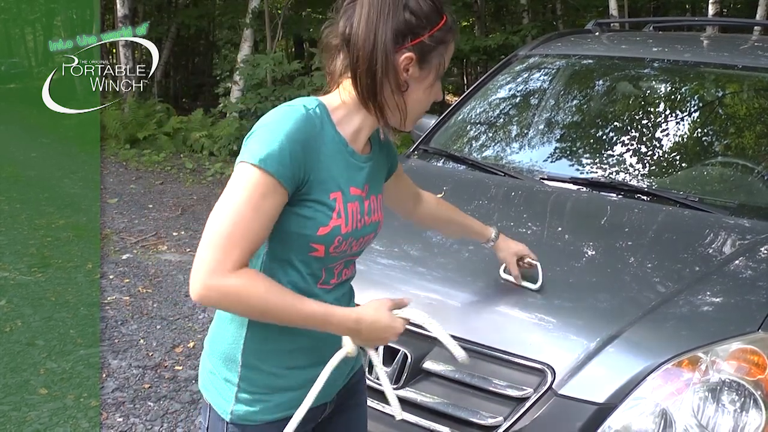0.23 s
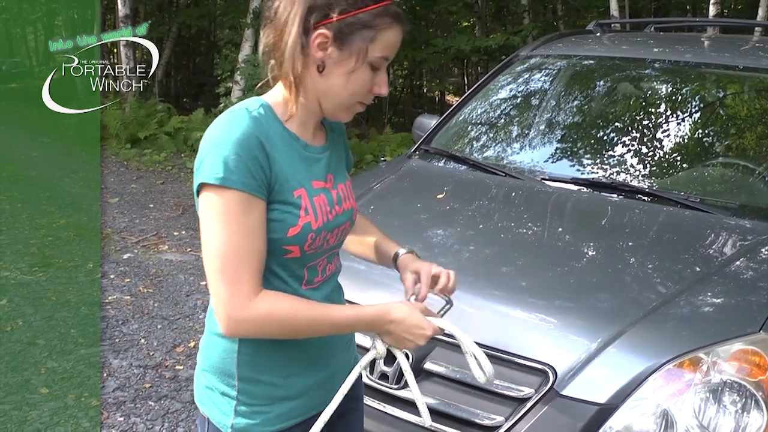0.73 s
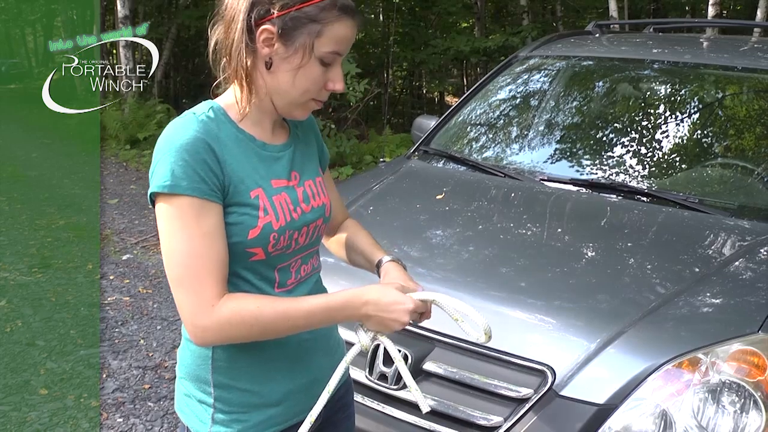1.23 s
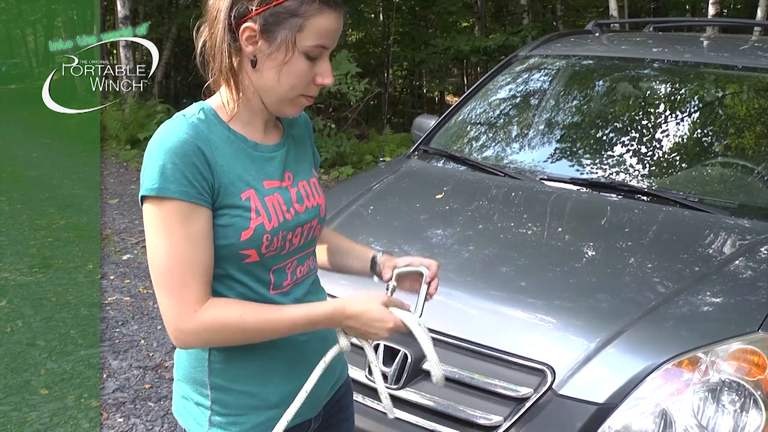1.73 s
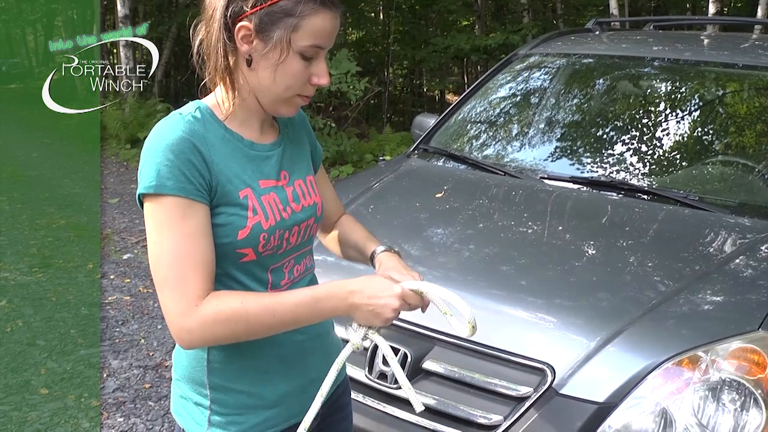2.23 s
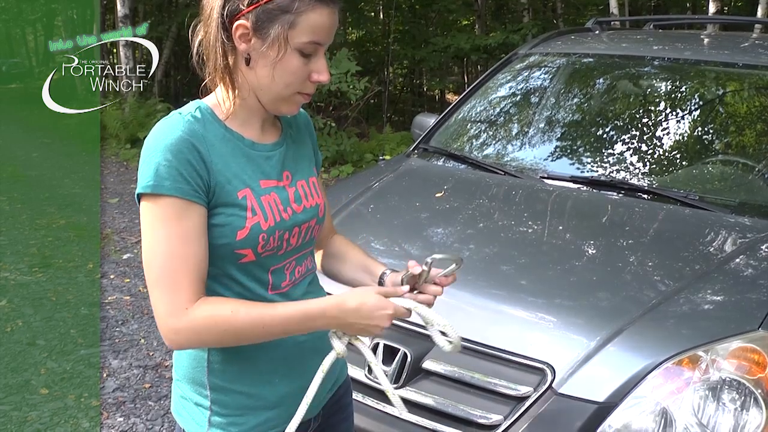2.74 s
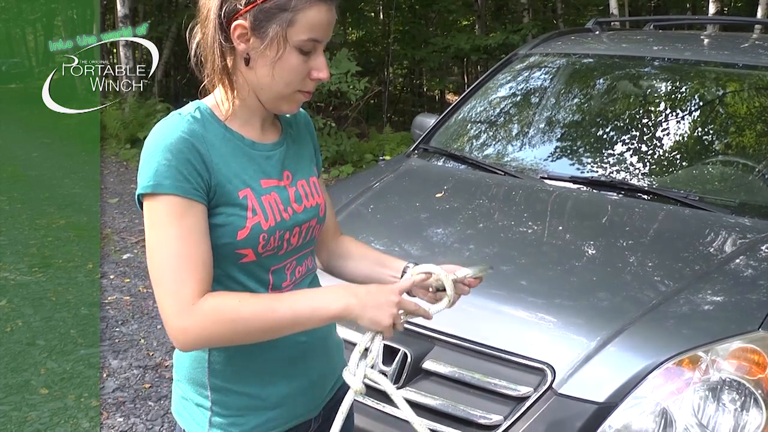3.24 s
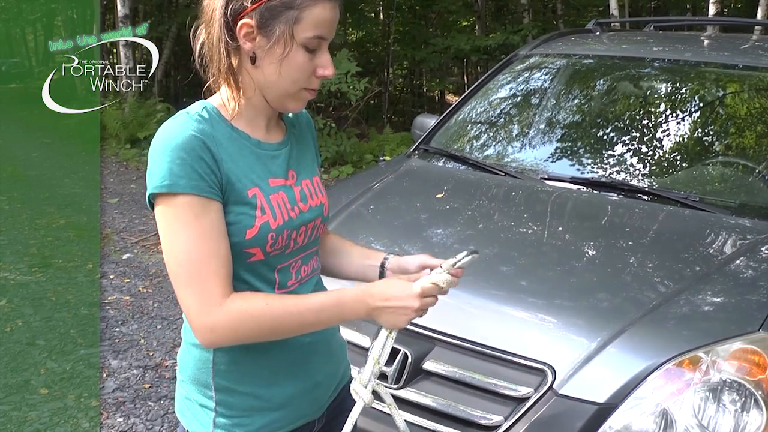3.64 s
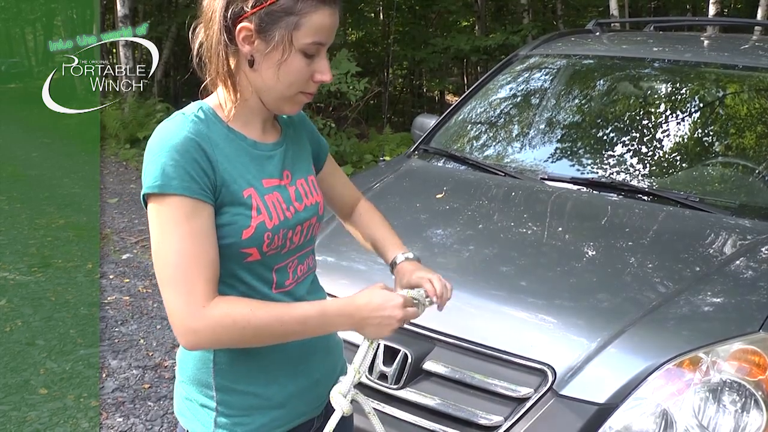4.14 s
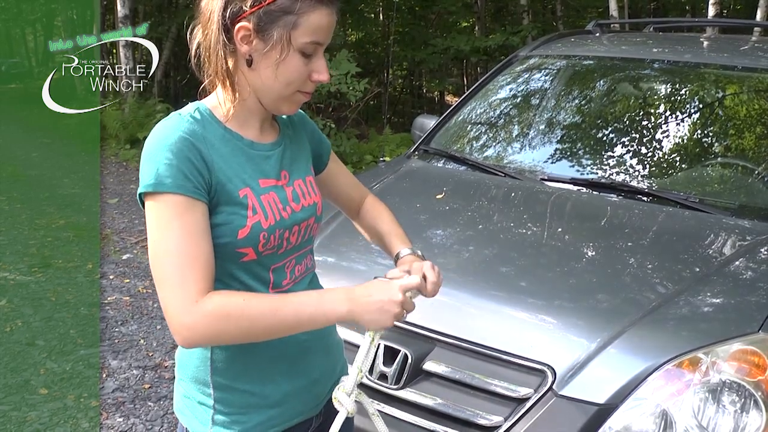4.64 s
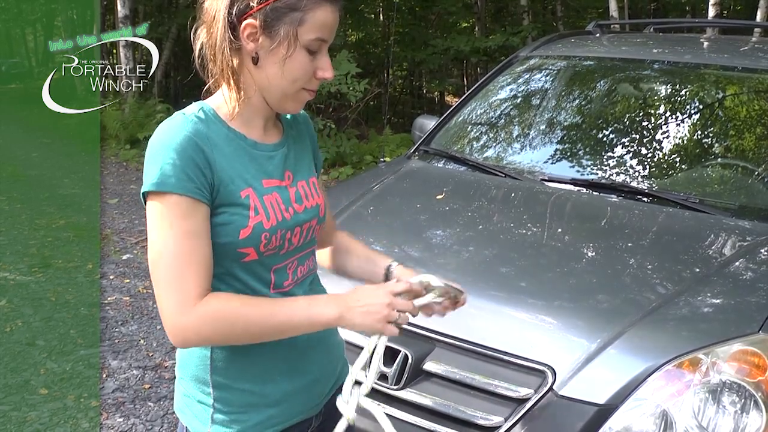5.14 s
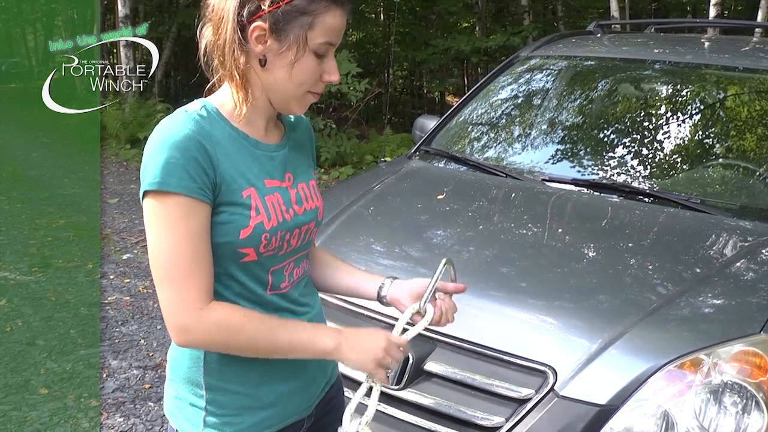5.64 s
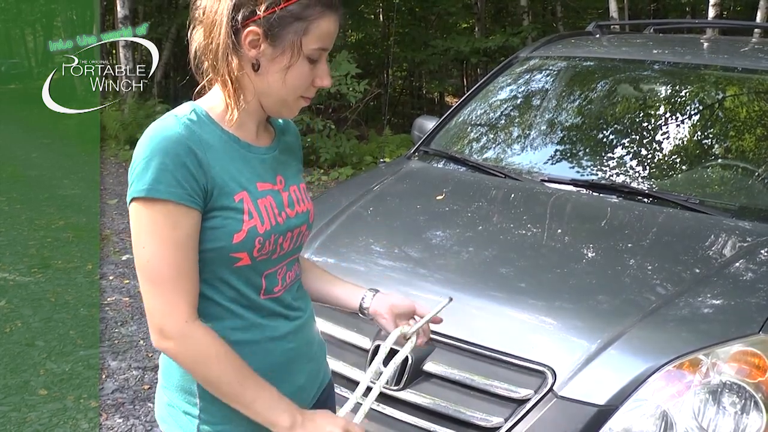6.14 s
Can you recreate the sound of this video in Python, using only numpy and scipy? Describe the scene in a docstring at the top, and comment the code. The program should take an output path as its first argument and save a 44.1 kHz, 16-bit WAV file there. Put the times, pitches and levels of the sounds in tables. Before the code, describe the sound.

A quiet scrape and light thumps on thin sheet metal open the scene, followed by a dull handling bump and a tiny steel tick. A carabiner gate then snaps shut twice, about two seconds apart: first open and bright, then tighter and damped in the hand. Gravel and trees give a short open-air echo. Rope fibres brush softly; a faint beating hum and low wind rumble continue throughout, picked up close.

```python
"""Knocks and a soft scrape come first: a steel carabiner is slid off a car's bonnet and clipped to a rope.
Its gate ticks once and snaps shut twice: each contact is a blow, a crack of noise and damped steel modes.
Gravel returns one echo and a wood a diffuse tail; thuds are decaying low modes, the rope is shaped noise.
Beneath lie a machine hum of beating tones and resonant noise, a low rumble of air and a little hiss."""
import sys
import numpy as np
from scipy import signal
from scipy.fft import rfft, irfft
from scipy.io import wavfile

SR = 44100
rng = np.random.default_rng(int(sys.argv[2]) if len(sys.argv) > 2 else 0)


def dump(signal):
    """Clip the signal to [-1, 1] and save it as 16-bit WAV at the path in sys.argv[1]."""
    limited = np.clip(np.atleast_2d(signal).T, -1, 1)
    pcm = np.round(limited * 32767).astype(np.int16)
    wavfile.write(sys.argv[1], SR, pcm)


N = 281269
T = np.arange(N) / SR

# Modes of the carabiner. Each row: frequency in Hz, t60 in seconds,
# relative level in dB in the open hand, relative level in dB in the closed grip.
STEEL_MODES = [(748, 0.018, -27.5, -34), (1186, .02, -36.5, -30.5), (1599, .03, -29, -21.5),
               (1855, 0.024, -25, -19.5), (2030, 0.03, -20.5, -26), (2450, 0.012, -26.5, -11.5),
               (2820, 0.015, -22, -17), (3007, 0.024, -4, -27.5), (3340, 0.02, -8.5, -24),
               (3690, .024, -6.5, -16), (3938, 0.036, -7, -11.5), (4175, 0.027, 0.5, -21),
               (4384, 0.021, 0, -24), (4780, 0.017, -16.5, -12.5), (4980, 0.03, -17, -15),
               (5350, 0.026, -8, -22), (5863, .02, -6, -27.5), (6270, 0.024, -15, -20.5),
               (6590, .02, -15, -21), (7780, 0.029, -14.5, -21.5), (7770, 0.024, -8.5, -20),
               (8760, .02, -18, -21.5), (9180, .024, -19.5, -14.5), (9406, 0.0234, -13.5, -17),
               (10350, 0.041, -19.5, -16), (11056, .016, -12.5, -27), (12250, 0.012, -20, -25.5),
               (13460, 0.02, -19.5, -29.5), (13380, .02, -25.5, -22.5), (15140, 0.014, -30, -15)]
# Bending modes that ring on long in the open hand; a closed grip quiets them. Each row: frequency in Hz,
# relative level in dB, t60 in seconds.
SINGING_MODES = [(3940, -48, 0.6), (4170, -41, 0.55), (4280, -40, 0.52), (4365, -43, .5)]
# Gate contacts. Each row: start in seconds, strength in relative dB,
# grip from 0 (open) to 1 (closed), contact softness as a low-pass cutoff in Hz.
GATE_CONTACTS = [(1.6996, -23.5, 0.65, 4900), (3.3087, -25, 0, 10100), (3.3135, 2.8, 0.16, 20000),
                 (5.1277, -0.5, 0.98, 20000), (5.1331, -17, 1, 20000)]
# Light touches of rope and fingers on the metal. Each row: start in seconds, strength in relative dB,
# contact softness as a low-pass cutoff in Hz.
LIGHT_TOUCHES = [(.447, -48, 3500), (1.203, -42, 5000), (1.838, -46, 3000), (2.614, -46, 4000),
                 (2.96, -44.5, 3000), (3.572, -44.5, 4000), (4.932, -43, 2200), (5.227, -45, 4000),
                 (5.452, -43, 2200), (5.816, -39, 2400), (6.338, -26.5, 2600)]

# Modes of the bonnet sheet. Each row: frequency in Hz, relative level in dB, t60 in seconds.
BONNET_MODES = [(63.6, -2, .25), (94, 1, 0.345), (120.7, 6.5, 0.33), (141, -11, 0.54), (200, -2.5, 0.23),
                (260.7, -6, 0.22), (363, -7, 0.063), (537, -7, 0.045), (804, -29, 0.098),
                (1100, -19, 0.019)]
# Knocks on the bonnet. Each row: start in seconds, relative level in dB.
BONNET_KNOCKS = [(0.097, -39), (.108, -29.5), (.142, -35), (0.249, -34), (.268, -30.5), (.306, -32)]
# Resonances of the scrape. Each row: frequency in Hz, bandwidth in Hz, relative level in dB.
SCRAPE_RESONANCES = [(141, 46, -3.5), (316, 110, -1), (530, 145, -5.5), (820, 86, -5), (1080, 120, -2.5),
                     (1430, 300, -7.5), (1840, 420, -8.5), (2870, 980, -12), (4490, 5600, -30)]
# Strokes of steel over paint: a skid, the drag and a short, lighter last push. # Each row: start in seconds,
# hold in seconds, level in dB.
SLIDE_STROKES = [(.096, 0.014, -42), (.168, .12, -41.5), (.25, 0.01, -44.5)]
SLIDE_ATTACK_S, SLIDE_RELEASE_S = 0.0074, 0.096
SHEET_DRONE_DB = -2.5  # the bonnet's modes under the scrape, relative to the scrape

# Modes of a dull handling bump. Each row: frequency in Hz, relative level in dB, t60 in seconds.
THUD_MODES = [(58.4, -2, .26), (69, 0.5, 0.19), (132, -7.5, .25), (230, -12.5, .12), (390, -8.5, 0.065)]
# Dull bumps. Each row: start in seconds, relative level in dB, softness as a low-pass cutoff in Hz.
DULL_BUMPS = [(1.48, -24, 900), (1.508, -19.5, 115), (1.579, -32, 65), (3.244, -28.5, 90)]

# Spectrum of the rope fibres. Each row: frequency in Hz, relative level in dB.
ROPE_SPECTRUM = [(600, -2), (1800, 3.5), (4000, -5), (9000, -18)]
# Pulls of rope through the hands. Each row: start in seconds, hold in seconds, level in dB.
ROPE_PULLS = [(4.89, 0.14, -64), (5.44, 0.018, -60), (5.63, 0.066, -62.5), (5.83, .06, -67)]
PULL_ATTACK_S, PULL_RELEASE_S = 0.044, 0.05
# Faint rustle of the fingers, present throughout.
FIDGET_DB, FIDGET_SWING_DB, FIDGETS_PER_S = -78, 4.5, 14

# Echo of the trees. Each row: frequency in Hz, relative level in dB, t60 in seconds.
WOOD_ECHO = [(302, -13, .4), (1502, -12, .45), (3160, -9, .48), (4300, 1, 0.59), (5972, -0.5, 0.42),
             (9200, 1.5, 0.34), (15000, -7, .31)]

# Resonances of the machine hum. Each row: frequency in Hz, half-width in Hz, level in dB outside the lulls.
HUM_RESONANCES = [(266.8, 2.2, -66.5), (311, 19, -63.5), (385.6, 3.5, -71), (453, 4.9, -71),
                  (804, 3, -70.5), (857, 62, -62.5), (944, 40, -66.5)]
# Lulls in the hum. Each row: start in seconds, hold in seconds,
# change of the main tone in dB, change of the weaker resonances in dB.
HUM_LULLS = [(3.17, 0.51, -19, -3), (3.43, 0.15, 1, -10.5), (5.132, 0.095, -22, -1), (6.32, .06, -8, 0)]
LULL_FALL_S, LULL_RETURN_S = 0.12, 0.099
BLIP_S, BLIP_HZ, BLIP_DB, BLIP_RAMP_S = 3.395, 900, -46, 0.015  # one faint blip in the hum

# Spectrum of the air rumble. Each row: frequency in Hz, relative level in dB.
RUMBLE_SPECTRUM = [(20, 3.5), (30, 1.5), (45, -7), (70, -8), (120, -18), (170, -27), (260, -33.5),
                   (420, -32.5), (700, -42), (1200, -78.5)]
# Gusts that lift the rumble. Each row: start in seconds, hold in seconds, rise in dB.
RUMBLE_GUSTS = [(1.58, .08, 6), (1.99, 0.11, 9), (2.73, .08, 7.5)]
GUST_RAMP_S, GUST_TOP_HZ = 0.047, 45
# Spectrum of the hiss. Each row: frequency in Hz, relative level in dB.
HISS_SPECTRUM = [(500, 3.5), (700, 10.5), (1200, 5), (1700, 1), (2600, -1), (4500, -2), (5350, 1.5),
                 (6300, -5), (10000, -5), (15500, -5.5)]
HISS_DB = -60.5  # rms
CUTOFF_HZ = 15700  # upper limit of the whole sound


def from_db(db):
    """Decibels as an amplitude ratio: 20 dB is a factor of ten."""
    return 10 ** (np.asarray(db) / 20)


def rms_one(x):
    """Normalization to unit root mean square."""
    return x / np.sqrt(np.mean(x ** 2) + 1e-20)


def at_hz(points, hz, axis=1):
    """Interpolation of a table column along logarithmic frequency."""
    points = np.array(points)
    return np.interp(np.log(np.maximum(hz, 1)), np.log(points[:, 0]), points[:, axis])


def cut(x, hz, kind, order=2):
    """Butterworth filtering, maximally flat in the pass band."""
    sections = signal.butter(order, np.clip(hz, 10, .47 * SR), kind, fs=SR, output="sos")
    return signal.sosfilt(sections, x + 1e-18)


def resonant(x, hz, width_hz):
    """Resonance as a pass band about its centre frequency; rms 1."""
    return rms_one(cut(x, [hz - width_hz / 2, hz + width_hz / 2], "band"))


def coloured(x, spectrum):
    """Spectral shaping: each frequency component is weighted by a level curve; rms 1."""
    gain = from_db(at_hz(spectrum, np.fft.rfftfreq(N, 1 / SR)))
    return rms_one(irfft(rfft(x) * gain, N))


def drift(rate):
    """Slow random variation: straight lines between normal values of unit spread, rate per second."""
    knots = rng.standard_normal(int(N / SR * rate) + 2)
    return np.interp(T * rate, np.arange(len(knots)), knots)


def ring(t, hz, t60):
    """Free decay of a struck mode: a sine that falls 60 dB in t60 seconds."""
    return np.sin(2 * np.pi * hz * t) * from_db(-60 * t / t60)


def swell(start, hold_s, attack_s, release_s):
    """Raised-sine envelope: it reaches 1 at the start, holds, then falls to 0."""
    ramp = np.minimum((T - start) / attack_s, (start + hold_s - T) / release_s)
    return np.sin(np.pi / 2 * np.clip(1 + ramp, 0, 1)) ** 2


def strokes(rows, attack_s, release_s):
    """Incoherent addition: where rubbing strokes overlap, their powers add."""
    power = sum((from_db(db) * swell(s, hold_s, attack_s, release_s)) ** 2 for s, hold_s, db in rows)
    return np.sqrt(power)


def add(out, s, sound):
    """Superposition of a sound that starts at s seconds."""
    start = max(round(s * SR), 0)
    out[start:start + len(sound)] += sound[:N - start]


def steel_modes(t, grip, scatter_db=2.0, twin_db=-4, twin_spread=0.026, paired_hz=4500):
    """Modal superposition: damped steel modes of alternating polarity, weighted in dB by the grip."""
    modes = 0
    for k, (hz, t60, open_db, closed_db) in enumerate(STEEL_MODES):
        level_db = open_db + grip * (closed_db - open_db) + scatter_db * rng.standard_normal()
        mode = ring(t, hz, t60)
        if hz > paired_hz:  # the loop also bends out of its plane, so high modes come in pairs that share the blow
            twin_hz = hz * (1 + twin_spread * rng.choice([-1, 1]) * rng.uniform(0.53, 1))
            pair = mode - from_db(twin_db) * ring(t, twin_hz, t60)
            mode = pair / np.hypot(1, from_db(twin_db))
        modes = modes + (-1) ** k * from_db(level_db) * mode
    return modes


def clink(grip, soft_hz, modes_db, crack_db=-6, crack_grip_db=-4.5, crack_t60=0.012, blow_db=-5):
    """Impact excitation: a blow, the gate's chatter and ringing modes; a softer contact passes less treble."""
    t = T[:SR // 8]
    modes = steel_modes(t, grip)
    blow = from_db(blow_db) * cut(ring(t, 2500, 0.00066), 890, "high")
    bright = cut(rng.standard_normal(len(t)), 1700, "high")
    chatter = rms_one(cut(bright, 7500, "low", order=1))
    crack = chatter * from_db(crack_db + grip * crack_grip_db - 60 * t / crack_t60)
    return cut(blow + crack + from_db(modes_db) * modes, soft_hz, "low")


def carabiner(modes_db, grip_damps_db=-30, waver_db=1.0, palm_hz=375, palm_db=-25, palm_t60=.012):
    """Contact damping: a closed grip quiets the singing modes of the gate snaps; soft touches are added."""
    out, t = np.zeros(N), T[:SR]
    for s, level_db, grip, soft_hz in GATE_CONTACTS:
        add(out, s, from_db(level_db) * clink(grip, soft_hz, modes_db))
        # in the open hand the loop sings on faintly, wavering as it turns
        sing = sum(from_db(db + waver_db * drift(90)[:SR]) * ring(t, hz, t60) for hz, db, t60 in SINGING_MODES)
        add(out, s, from_db(level_db + modes_db + grip * grip_damps_db) * sing)
        # and kicks against the palm
        add(out, s, from_db(level_db + palm_db) * (1 - grip) * ring(t, palm_hz, palm_t60))
    for s, level_db, soft_hz in LIGHT_TOUCHES:
        add(out, s, from_db(level_db) * clink(1, soft_hz, modes_db))
    return out


def ground(x, delay_s=.0062, echo_db=-10, dull_hz=8000):
    """Specular reflection: the direct sound and one delayed, duller echo off the gravel."""
    echo = np.interp(T - delay_s, T, x)
    return x + from_db(echo_db) * cut(echo, dull_hz, "low", order=1)


def trees(x, echo_db=-22.5, build_s=0.018):
    """Diffuse scattering: echoes from many trunks build up as noise and die band by band."""
    t, edges, scatter = T[:SR], np.geomspace(250, 16000, 13), 0
    for low, high in zip(edges, edges[1:]):
        hz = np.sqrt(low * high)
        fade_db = at_hz(WOOD_ECHO, hz) - 60 * t / at_hz(WOOD_ECHO, hz, axis=2)
        scatter = scatter + cut(rng.standard_normal(len(t)), [low, high], "band") * from_db(fade_db)
    scatter = scatter * (1 - np.exp(-t / build_s))
    return from_db(echo_db) * signal.fftconvolve(x, scatter / np.linalg.norm(scatter))[:N]


def bonnet_knocks(knocks_db=-3):
    """Impulse response of a sheet: each knock sets off its damped modes with random polarity."""
    out, t = np.zeros(N), T[:SR // 2]
    for s, knock_db in BONNET_KNOCKS:
        for hz, db, t60 in BONNET_MODES:
            level = from_db(knocks_db + knock_db + db + rng.normal(0, 0.93))
            add(out, s, level * rng.choice([-1, 1]) * ring(t, hz, t60))
    return out


def bonnet_scrape(grain_db=2.5, swell_db=3.5, slips_per_s=4000):
    """Stick-slip friction: tiny random slips drive resonances that swell as the contact moves, and the sheet."""
    t = T[:SR // 2]
    slips = (rng.random(N) < slips_per_s / SR) * rng.standard_normal(N)
    slips = slips * from_db(grain_db * drift(118))
    scrape = 0
    for hz, width_hz, db in SCRAPE_RESONANCES:
        scrape = scrape + from_db(db + swell_db * drift(35)) * resonant(slips, hz, width_hz)
    pressure = strokes(SLIDE_STROKES, SLIDE_ATTACK_S, SLIDE_RELEASE_S)
    sheet = sum(from_db(db) * ring(t, hz, t60) for hz, db, t60 in BONNET_MODES)
    drone = signal.fftconvolve(pressure * rms_one(slips), sheet / np.linalg.norm(sheet))[:N]
    return pressure * rms_one(scrape) + from_db(SHEET_DRONE_DB) * drone


def bumps():
    """Low-frequency impact: soft thuds swing a few times; the softer the contact, the duller."""
    out = np.zeros(N)
    body = sum(from_db(db) * ring(T[:SR // 2], hz, t60) for hz, db, t60 in THUD_MODES)
    for s, level_db, soft_hz in DULL_BUMPS:
        add(out, s, from_db(level_db) * cut(body, soft_hz, "low"))
    return out


def rope(grain_db=2.5):
    """Fibre friction as grainy noise: fibres catch and let go in each pull, and faintly all the time."""
    grain = rng.standard_normal(N) * from_db(grain_db * drift(100))
    fibres = coloured(grain, ROPE_SPECTRUM)
    fidget = from_db(FIDGET_DB + FIDGET_SWING_DB * drift(FIDGETS_PER_S))
    pulls = strokes(ROPE_PULLS, PULL_ATTACK_S, PULL_RELEASE_S)
    return np.hypot(pulls, fidget) * fibres


def hum(main_hz=329, waver_hz=2.2, main_db=-57.0, partner_db=-5, beat_per_s=5, beat_waver_per_s=3):
    """Beating: a wavering tone meets a weaker partner, among resonant noise; the lulls shift both levels."""
    tone_db, rest_db = main_db, 0
    for s, hold_s, tone_change_db, rest_change_db in HUM_LULLS:
        lull = swell(s, hold_s, LULL_FALL_S, LULL_RETURN_S)
        tone_db = tone_db + tone_change_db * lull
        rest_db = rest_db + rest_change_db * lull
    phase = 2 * np.pi * np.cumsum(main_hz + waver_hz * drift(8.2)) / SR
    beat = 2 * np.pi * np.cumsum(beat_per_s + beat_waver_per_s * drift(5)) / SR
    pair = np.sin(phase) + from_db(partner_db) * np.sin(phase + beat)
    tone = np.sqrt(2) * from_db(tone_db) * pair  # the root of 2 makes main_db the rms of the main sine
    f = np.fft.rfftfreq(N, 1 / SR)
    shape = sum(from_db(db) * rms_one(1 / (1 + ((f - hz) / width_hz) ** 2))
                for hz, width_hz, db in HUM_RESONANCES)
    resonances = irfft(rfft(rng.standard_normal(N)) * shape, N)
    blip = from_db(BLIP_DB) * swell(BLIP_S, 0, BLIP_RAMP_S, BLIP_RAMP_S) * np.sin(2 * np.pi * BLIP_HZ * T)
    return tone + blip + from_db(rest_db) * resonances


def air(rumble_db=-37.0):
    """Broadband flow noise: a low rumble whose deepest part swells in the gusts, and an even hiss."""
    rumble = from_db(rumble_db) * cut(coloured(rng.standard_normal(N), RUMBLE_SPECTRUM), 11, "high")
    rise_db = sum(db * swell(s, hold_s, GUST_RAMP_S, GUST_RAMP_S) for s, hold_s, db in RUMBLE_GUSTS)
    low_pass = 1 / (1 + (np.fft.rfftfreq(N, 1 / SR) / GUST_TOP_HZ) ** 4)
    deep = irfft(rfft(rumble) * low_pass, N)
    hiss = from_db(HISS_DB) * coloured(rng.standard_normal(N), HISS_SPECTRUM)
    return rumble + (from_db(rise_db) - 1) * deep + hiss


def scene():
    """Superposition of all sources, identical in both channels."""
    near = ground(carabiner(modes_db=-0.5))
    # the crack spreads in all directions, the ring more narrowly, so the trees get weaker modes
    far = trees(carabiner(modes_db=-5.0))
    bonnet = bonnet_knocks() + bonnet_scrape()
    mono = near + far + bonnet + bumps() + rope() + hum() + air()
    return np.array([mono, mono])


def record(dry, top=1.0):
    """Saturation and band limiting: the loudest snap overloads the input, and the top is cut."""
    clipped = dry / (1 + (dry / top) ** 4) ** (1 / 4)
    low_pass = signal.ellip(10, .1, 80, CUTOFF_HZ, fs=SR, output="sos")
    return signal.sosfilt(low_pass, clipped)


dry = scene()
out = record(dry)
dump(out)
```